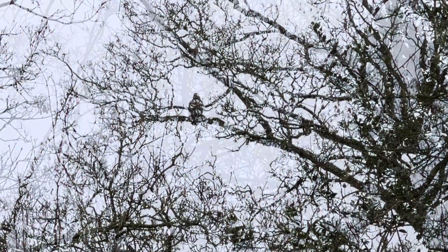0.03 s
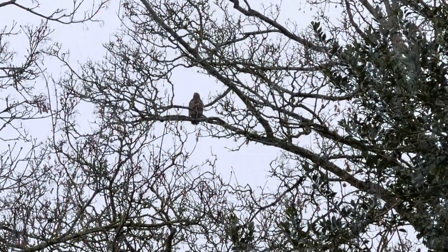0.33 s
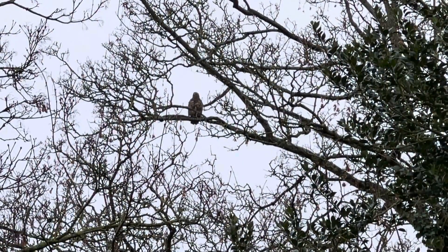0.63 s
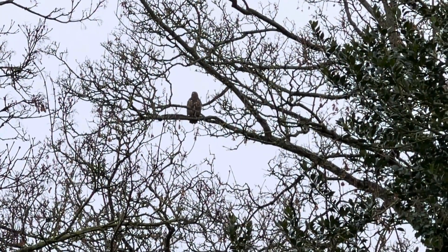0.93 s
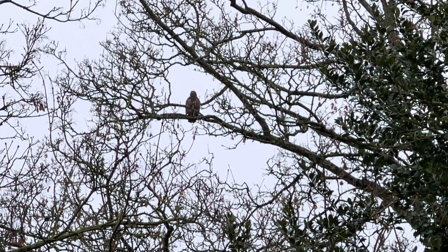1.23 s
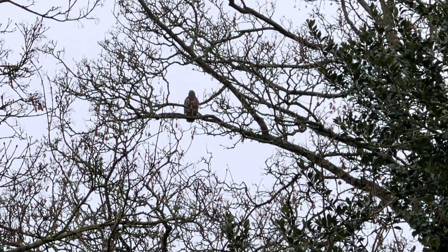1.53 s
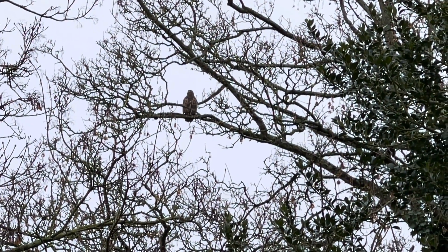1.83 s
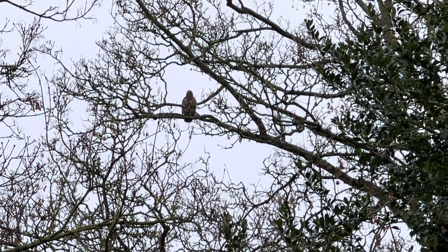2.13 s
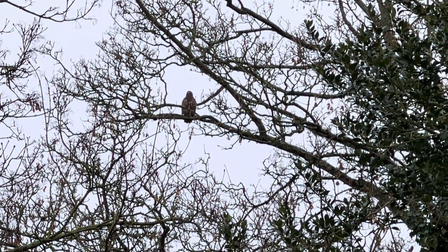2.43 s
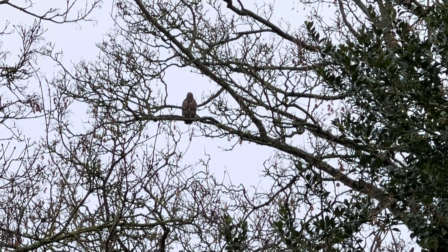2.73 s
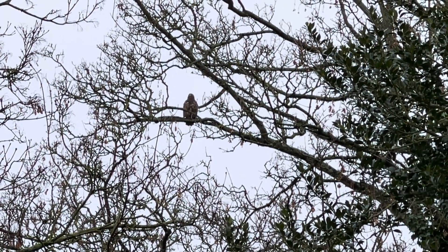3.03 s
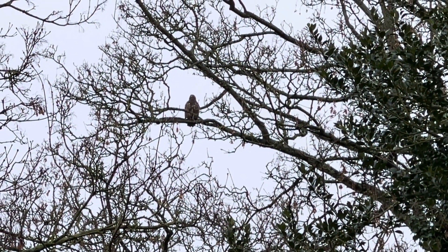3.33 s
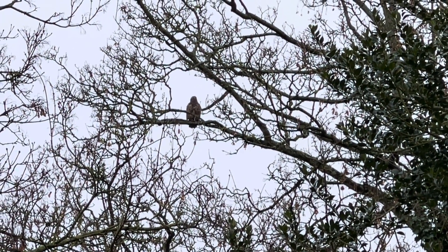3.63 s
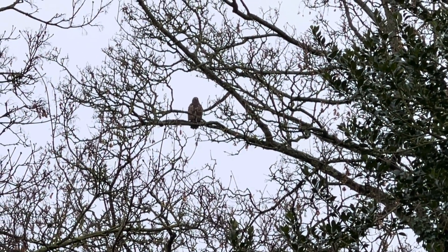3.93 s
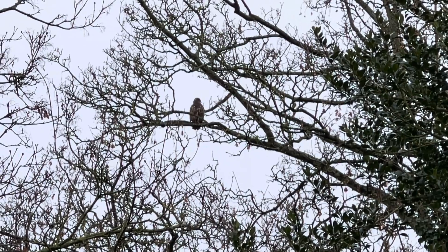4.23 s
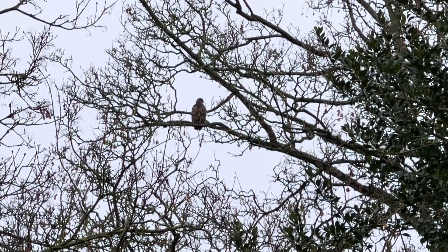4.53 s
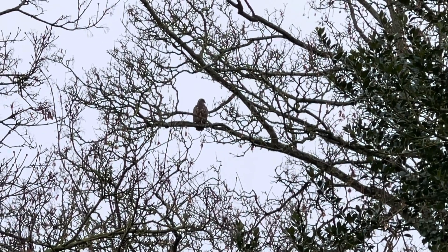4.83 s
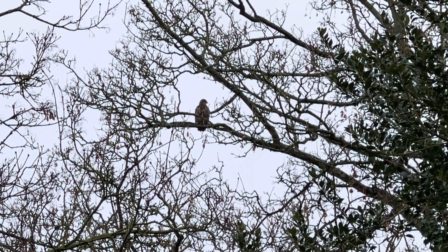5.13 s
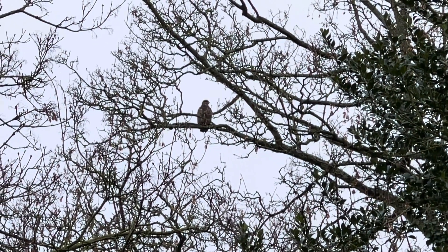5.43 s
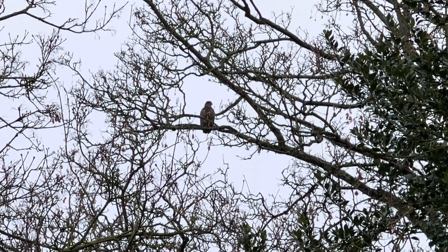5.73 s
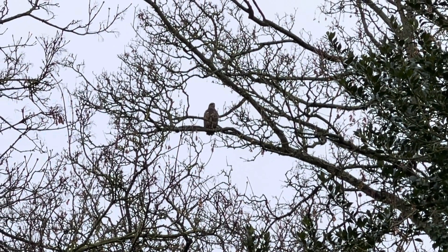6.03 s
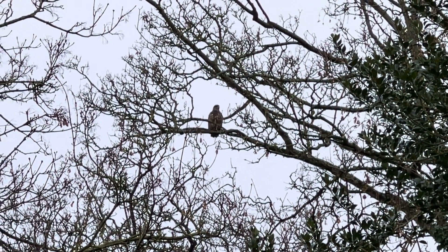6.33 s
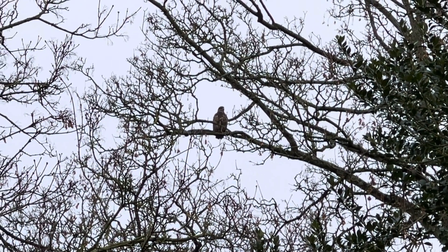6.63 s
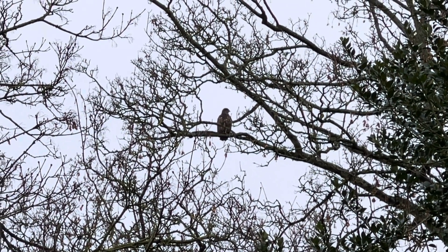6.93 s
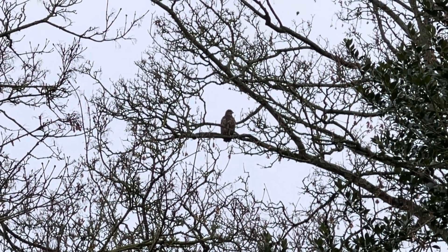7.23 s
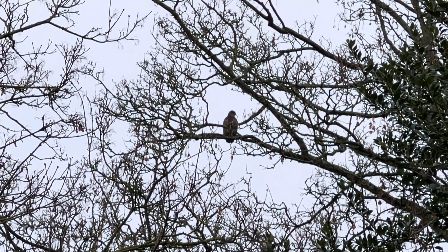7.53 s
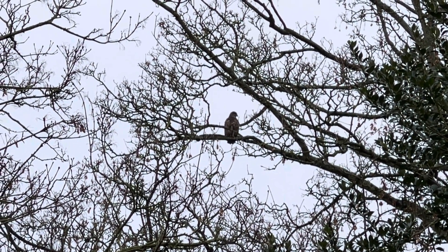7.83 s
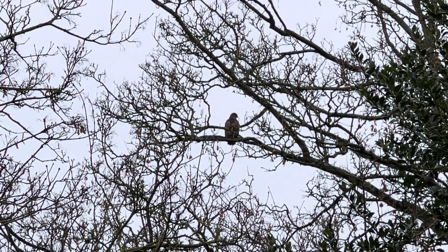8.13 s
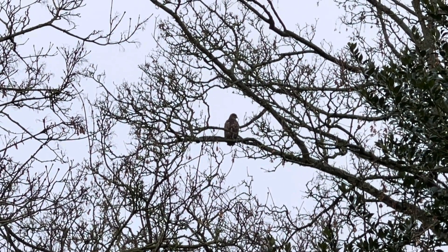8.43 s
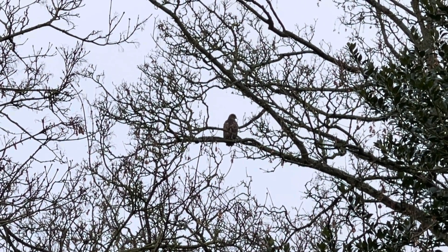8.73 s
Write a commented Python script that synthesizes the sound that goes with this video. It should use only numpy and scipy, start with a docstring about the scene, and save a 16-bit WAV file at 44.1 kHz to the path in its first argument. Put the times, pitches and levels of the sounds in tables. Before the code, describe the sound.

Small songbirds whistle, chirp, buzz and twitter in a garden over a low rumble of distant traffic and faint leaf hiss.

```python
"""Small songbirds sing in a winter garden: thin whistles come first, then buzzes, a nasal call,
hoarse and clear slides, falling chirps and a two-voiced twitter. Each note comes from a vibrating
membrane in the voice box; trunks and branches scatter it into a soft echo. Farther birds call
and chatter over a faint hiss of leaves and the low rumble of distant traffic."""
import sys
import numpy as np
from scipy import signal
from scipy.fft import rfft, irfft, next_fast_len
from scipy.io import wavfile
from scipy.ndimage import uniform_filter1d, map_coordinates

SR = 44100
rng = np.random.default_rng(int(sys.argv[2]) if len(sys.argv) > 2 else 0)


def bounce(signal):
    """Save signal as a 16-bit WAV file at the path given by the first command-line argument."""
    frames = np.transpose(np.atleast_2d(signal))
    limited = np.clip(frames, -1, 1)
    pcm = np.round(limited * 32767).astype(np.int16)
    wavfile.write(sys.argv[1], SR, pcm)


N = 396459

# the tones in a clear, almost pure voice: pitch_multiple, level_db
CLEAR_VOICE = [(1, 1), (2, -40.5)]
PROGRESS = np.linspace(0, 1, 25)  # from a note's start to its end
LEFT_RIGHT = np.array([[1], [-1]])  # opposite signs for the two ears


def undb(db):
    """Turn decibels into a gain."""
    return 10 ** (np.asarray(db) / 20)


def unit(x):
    """Scale a sound to an average power of 1."""
    return x / np.sqrt(np.mean(x ** 2))


def add(track, start_s, sound):
    """Mix a sound into a track."""
    start = max(int(start_s * SR), 0)
    track[start:start + len(sound)] += sound[:max(len(track) - start, 0)]


def wander(rate_hz, size):
    """A smooth random curve that strays about 1 either side of zero."""
    step = max(int(SR / rate_hz), 1)
    knots = rng.standard_normal(size // step + 2)
    return 1.335 * uniform_filter1d(np.interp(np.arange(size) / step, np.arange(len(knots)), knots), step)


def colour(points):
    """A gain for every frequency, drawn through (frequency_hz, level_db) points."""
    hz, db = np.transpose(points)
    frequencies = np.fft.rfftfreq(next_fast_len(N), 1 / SR)
    return undb(np.interp(np.log(frequencies + 1), np.log(hz), db))


def noise(gain):
    """Noise with the given gain at each frequency."""
    size = next_fast_len(N)
    return irfft(rfft(rng.standard_normal(size)) * gain, size)[:N]


def traffic():
    """Distant traffic: a rumble almost alike in both ears, and tyre noise from all around."""
    # tone of the traffic: frequency_hz, relative_db
    spectrum = [(12, -42), (20, -15.5), (36, -3.5), (59, 1.5), (91, -6), (238, -15), (290, -20), (320, -19),
                (375, -25), (493, -24), (544, -24.5), (856, -24), (2200, -38.5), (2860, -66.5),
                (4840, -120)]
    # how much the two ears differ: frequency_hz, side_minus_middle_db
    width = [(60, -23), (100, -19), (180, -12.5), (320, -6.5), (550, -2), (1660, -5.5)]
    # the traffic swells and fades: time_s, rumble_db, tyres_db
    levels = [(0.0, -53, -62.5), (1.0, -52, -62), (1.55, -54, -62.5), (3.25, -55.5, -63), (4.078, -53, -65),
              (4.33, -55, -64.5), (7.91, -55, -63.5), (8.16, -55, -60.5), (8.99, -51, -66)]
    times, rumble_db, tyres_db = np.transpose(levels)
    rumble_share = colour([(220, 0), (400, -37.5)])
    tyres_share = np.sqrt(1 - rumble_share ** 2)
    out = 0
    for share, level_db in ((rumble_share, rumble_db + 1), (tyres_share, tyres_db + 1)):
        gain = colour(spectrum) * share
        middle, side = noise(gain), noise(gain * colour(width))
        drifting_db = np.interp(np.arange(N) / SR, times, level_db) + .5 * wander(4.3, N)
        out += (middle + LEFT_RIGHT * side) / np.std(middle) * undb(drifting_db)
    return out


def leaves(level_db=-75, side_db=-8):
    """Leaves and very distant birds blur into a faint, drifting hiss."""
    # tone of the hiss: frequency_hz, relative_db
    spectrum = [(1500, -5.5), (2300, 1), (3500, 1.5), (5000, -9.5), (6500, -9), (9000, -20.5), (12000, -21),
                (14000, -61)]
    gain = colour(spectrum)
    hiss = unit(noise(gain)) + LEFT_RIGHT * undb(side_db) * unit(noise(gain))
    return hiss * undb(level_db + 1.9 * wander(2.5, N))


def garden_echo(sound, twigs_db, twigs_s, tail_db, tail_s, treble_s, side_db=-20):
    """Branches echo first, then trees add a tail that dulls. Each time is for a fade of 60 dB."""
    t = np.arange(int(1.5 * SR)) / SR
    low_pass = signal.butter(4, 5500, fs=SR, output="sos")
    echoes = []
    for _ in range(2):  # middle, then side
        twigs = rng.standard_normal(len(t)) * (rng.random(len(t)) < 2500 / SR)
        twigs *= undb(-60 * t / twigs_s) * (1 - np.exp(-t / 0.0045))
        trees = rng.standard_normal(len(t))
        low = signal.sosfiltfilt(low_pass, trees)
        tail = low * undb(-60 * t / tail_s) + (trees - low) * undb(-60 * t / treble_s)
        tail *= 1 - np.exp(-t / 0.03)
        response = (undb(twigs_db) * unit(twigs) + undb(tail_db) * unit(tail)) / np.sqrt(len(t))
        echoes.append(signal.fftconvolve(sound, response)[:N])
    return echoes[0] + undb(side_db) * echoes[1] * LEFT_RIGHT


def breath(size, crest, edge_db):
    """Air pressure in a note: it opens, peaks near the crest (0 start, 1 end), falls and closes."""
    progress = np.linspace(0, 1, size)
    opening, closing = 0.013 + .003 * SR / size, 0.047  # shares of the note
    ramp = np.clip(np.minimum(progress / opening, (1 - progress) / closing), 0, 1)
    swell_db = np.interp(progress, [0, np.clip(crest, .05, .95), 1], [edge_db, 0, edge_db])
    return np.sin(np.pi / 2 * ramp) * undb(swell_db)


def sing(notes, voice, edge_db, waver, flutter_db, buzz_depth=0, buzz_hz=97.4, hoarse=0):
    """A membrane glides through each note's pitches; in a buzz its tension shakes fast and unevenly."""
    out = np.zeros(N)
    for start_s, length_s, db, crest, *pitches in notes:
        size = int(max(length_s, .008) * SR)
        steps = np.linspace(0, len(pitches) - 1, size)
        hz = map_coordinates(np.array(pitches, float), [steps], order=2, mode="nearest")
        shake_hz = buzz_hz * (1 + 0.325 * wander(116, size))
        shake = np.sin(2 * np.pi * np.cumsum(shake_hz) / SR)
        hz *= 1 + waver * wander(249.7, size) + buzz_depth * shake
        phase = 2 * np.pi * np.cumsum(hz) / SR
        tone = sum(undb(tone_db) * np.sin(multiple * phase) for multiple, tone_db in voice)
        flutter = wander(130, size)
        pressure = breath(size, crest, edge_db) * undb(db + flutter_db * (flutter - flutter.mean()))
        # an unsteady membrane smears each tone into a narrow band of noise
        grain = (1 + hoarse * wander(1400, size)) / np.sqrt(1 + hoarse ** 2)
        add(out, start_s, np.sqrt(2) * pressure * grain * tone)
    return out


def glide(start_hz, end_hz):
    """Pitch that moves in a straight line."""
    return start_hz + (end_hz - start_hz) * PROGRESS


def stepped_fall(top_hz, bottom_hz, ledge=.9):
    """Pitch that drops, lingers and drops again; a ledge of 1 is flat, 0 a straight fall."""
    return top_hz + (bottom_hz - top_hz) * (PROGRESS + ledge * np.sin(2 * np.pi * PROGRESS) / (2 * np.pi))


def turning_notes(rows, crest, roundness):
    """Notes that ease into a turning pitch and out again; the wider swing takes longer."""
    notes = []
    for start_s, length_s, db, start_hz, turn_hz, end_hz in rows:
        before, after = np.abs([start_hz - turn_hz, end_hz - turn_hz]) ** (1 / roundness)
        swing_hz = np.abs((before + after) * PROGRESS - before) ** roundness
        direction = np.sign(start_hz + end_hz - 2 * turn_hz)
        notes.append((start_s, length_s, db, crest, *(turn_hz + direction * swing_hz)))
    return notes


def remote_birds(count=44, centre_hz=3900):
    """The farthest birds scatter faint short notes, each with its own slope and arch."""
    span, notes = np.linspace(-1, 1, 5), []
    for when, length, loud, high, slope, arch in rng.uniform(-1, 1, (count, 6)):
        start_s = (when + 1) / 2 * N / SR
        octaves = 0.62 * high + 0.266 * slope * span - 0.13 * arch * span ** 2
        notes.append((start_s, 0.028 * 2 ** length, -71 + 4 * loud, .5, *(centre_hz * 2 ** octaves)))
    return sing(notes, CLEAR_VOICE, edge_db=-6, waver=.023, flutter_db=3)


def far_birds(arch_drop=0.26):
    """Birds in farther trees sing arched calls and thin, straight whistles."""
    # arched calls: start_s, length_s, level_db, top_hz, top_place (0 to 1)
    calls = [ (0.106, 0.082, -67, 4960, 0.51), (0.25, 0.036, -68.5, 4530, .7),
             (0.353, 0.025, -72, 4970, .95), (0.507, 0.047, -65.5, 4170, .55),
             (1.874, 0.016, -71.5, 3350, .6), (1.999, 0.019, -70, 3860, 0.88),
             (2.054, 0.018, -69, 3840, .9), (2.087, 0.077, -75, 7940, 0), (2.201, .016, -71, 3850, .05),
             (3.657, 0.024, -59, 3760, .05), (3.795, 0.093, -71.5, 4930, 0.62),
             (3.851, 0.077, -65.5, 4040, 0.49), (5.075, .095, -70.5, 8970, .45),
             (5.214, 0.085, -66.5, 5120, 0.55), (5.291, 0.052, -66, 4110, 0.02),
             (6.25, 0.094, -63, 5200, .8), (6.832, 0.031, -67, 4230, .2)]
    # thin whistles: start_s, length_s, level_db, start_hz, end_hz
    wisps = [ (1.53, 0.16, -79.5, 8400, 7840), (1.725, 0.3, -80, 8240, 8600),
             (1.917, 0.11, -75, 7670, 7090), (2.222, 0.15, -82.5, 5750, 5430),
             (4.316, 0.056, -66.5, 5150, 4970), (4.451, 0.039, -69, 5300, 4730),
             (4.538, 0.071, -74.5, 5660, 5870), (7.723, 0.57, -77, 8200, 7960),
             (7.731, 0.67, -80.5, 9130, 8800)]
    notes = []
    for start_s, length_s, db, top_hz, top_place in calls:
        from_top = (PROGRESS - top_place) / max(top_place, 1 - top_place)
        notes.append((start_s, length_s, db, .52, *(top_hz * (1 - arch_drop * from_top ** 2))))
    for start_s, length_s, db, start_hz, end_hz in wisps:
        notes.append((start_s, length_s, db, 1, *glide(start_hz, end_hz)))
    return sing(notes, CLEAR_VOICE, edge_db=-2, waver=.012, flutter_db=2)


def rasps(chatter_s=.058, chatter_hz=2220, chatter_width_hz=1150, grain_db=3):
    """Calls without a tone: grainy breath noise rings broadly in the throat."""
    # harsh calls and ticks: start_s, length_s, level_db, centre_hz, width_hz
    calls = [ (.985, 0.11, -59, 3180, 1900), (1.0, 0.11, -61.5, 7470, 2600),
             (2.366, 0.033, -62, 2780, 1200), (4.753, 0.023, -72, 5660, 1700),
             (4.842, 0.027, -69.5, 5500, 1700), (4.915, 0.021, -70, 5600, 2000),
             (8.103, 0.021, -76.5, 5900, 1800), (8.316, 0.026, -51, 5270, 1600)]
    # one bird repeats a short rasp, slowing down: start_s, level_db
    chatter = [(5.665, -58), (5.727, -58), (5.799, -56), (5.866, -59), (5.946, -61), (6.027, -59),
               (6.109, -60.5), (6.204, -60.5), (6.307, -56.5)]
    repeats = [(start_s, chatter_s, db, chatter_hz, chatter_width_hz) for start_s, db in chatter]
    out = np.zeros(N)
    for start_s, length_s, db, hz, width_hz in calls + repeats:
        size = int(length_s * SR)
        throat = signal.butter(3, [hz - width_hz / 2, hz + width_hz / 2], "band", fs=SR, output="sos")
        air = rng.standard_normal(size) * undb(grain_db * wander(300, size))
        rasp = unit(signal.sosfilt(throat, air))
        add(out, start_s, rasp * breath(size, crest=0.68, edge_db=-14) * undb(db))
    return out


def nasal_call():
    """A low note whose strong overtones make it sound nasal."""
    # the call: start_s, length_s, level_db, start_hz, turn_hz, end_hz
    call = [(2.825, 0.29, -59.5, 1148, 1191, 1138)]
    # its tones: pitch_multiple, level_db
    voice = [(1, -14), (2, -9), (3, -6), (4, 0), (5, -2), (6, -11), (7, -11), (8, -20), (9, -21)]
    notes = turning_notes(call, crest=0.75, roundness=2)
    return sing(notes, voice, edge_db=-8, waver=0.0106, flutter_db=1.5, hoarse=.26)


def buzzes():
    """Sliding notes that buzz as the membrane's tension shakes."""
    # buzzing notes: start_s, length_s, level_db, start_hz, turn_hz, end_hz
    slides = [ (2.425, 0.16, -60.5, 7300, 5900, 5900), (2.428, 0.26, -62, 3690, 2700, 2956),
              (2.514, .12, -42, 5600, 5590, 4300), (2.61, 0.13, -45.5, 4690, 5720, 5610),
              (3.222, 0.096, -39.5, 5410, 6310, 5310), (3.292, 0.055, -43, 5100, 6850, 6140)]
    # their tones: pitch_multiple, level_db
    voice = [(1, 0), (1.5, -27), (2, -31)]
    notes = turning_notes(slides, crest=0.43, roundness=1.4)
    return sing(notes, voice, edge_db=-8.5, waver=0.0241, flutter_db=3.5, buzz_depth=0.041, hoarse=.5)


def hoarse_slides():
    """Sharply turning notes, roughened by an unsteady membrane."""
    # hoarse notes: start_s, length_s, level_db, start_hz, turn_hz, end_hz
    slides = [ (2.927, 0.024, -48.5, 3670, 4400, 3970), (2.938, 0.054, -48, 2535, 3270, 2440),
              (3.03, 0.048, -51.5, 2600, 4360, 4400), (3.066, 0.054, -38, 4860, 3640, 3600),
              (3.11, 0.054, -40.5, 3690, 3480, 4280), (3.252, 0.035, -35, 6300, 6200, 4160),
              (3.39, .065, -46, 4450, 4450, 2124), (3.405, .038, -46.5, 2310, 3180, 2330),
              (3.513, 0.031, -38.5, 4600, 4510, 5210), (3.528, .118, -39, 3240, 4070, 2350)]
    # their tones: pitch_multiple, level_db
    voice = [(1, -3), (2, -30.5)]
    notes = turning_notes(slides, crest=.42, roundness=1.15)
    return sing(notes, voice, edge_db=-8, waver=.028, flutter_db=2.5, hoarse=.55)


def clear_slides():
    """Pure notes that swing smoothly to a turning pitch and back."""
    # clear notes: start_s, length_s, level_db, start_hz, turn_hz, end_hz
    slides = [ (.045, 0.21, -69, 6730, 8330, 7250), (.31, 0.21, -65.5, 7070, 8170, 7480),
              (6.011, 0.03, -40, 3974, 3080, 3500), (6.165, 0.068, -66, 7420, 7500, 6250),
              (6.41, 0.063, -59.5, 7850, 7800, 6400), (7.263, 0.031, -45, 5420, 3330, 3630),
              (7.343, .022, -41, 5750, 4400, 5060), (7.362, 0.028, -39.5, 4960, 4420, 4450),
              (7.487, .041, -46.5, 4870, 3890, 3890), (8.32, 0.086, -40.5, 5030, 6160, 4600),
              (8.445, 0.04, -40, 4290, 4520, 3970), (8.485, .04, -44.5, 4375, 4150, 4900),
              (8.573, .072, -40, 4620, 5104, 4810)]
    notes = turning_notes(slides, crest=0.79, roundness=2)
    return sing(notes, CLEAR_VOICE, edge_db=-7, waver=.007, flutter_db=2.5)


def chirps(crest=0.64):
    """Short notes that fall steeply, lingering halfway."""
    # chirps: start_s, length_s, level_db, top_hz, bottom_hz
    falls = [ (5.606, 0.046, -62, 6050, 4520), (5.778, .016, -57.5, 5080, 4180),
             (5.792, .016, -52.5, 7750, 5850), (5.809, 0.039, -50, 6990, 4130),
             (5.916, 0.015, -50, 7100, 5020), (5.925, 0.015, -44, 5100, 3900),
             (5.94, 0.013, -43, 4220, 2800), (6.095, 0.02, -43, 3887, 2787),
             (7.319, 0.0099, -45, 4770, 4010), (8.935, 0.058, -47.5, 4170, 3100)]
    notes = [(start_s, length_s, db, crest, *stepped_fall(top_hz, bottom_hz))
             for start_s, length_s, db, top_hz, bottom_hz in falls]
    return sing(notes, CLEAR_VOICE, edge_db=-7, waver=.016, flutter_db=2.5)


def twitter(crest=0.49, lead_s=.014, second_length_s=0.02, flick_hz=2040, flick_s=.002):
    """Each syllable is two overlapping falls, one from each side of the voice box."""
    # syllables: start_s, length_s, level_db, top_hz, bottom_hz
    syllables = [ (6.496, 0.033, -47, 8120, 6370), (6.548, 0.036, -43, 7740, 6400),
                 (6.607, 0.033, -43, 8000, 5520), (6.698, 0.035, -45.5, 8340, 5540),
                 (6.861, 0.032, -44, 8370, 5620), (6.933, .041, -47, 7900, 5290),
                 (7.038, 0.031, -48, 8900, 6350), (7.143, 0.04, -48, 8730, 5360)]
    flick = flick_hz * np.exp(-PROGRESS * second_length_s / flick_s)
    notes = []
    for start_s, length_s, db, top_hz, bottom_hz in syllables:
        notes.append((start_s, length_s, db, crest, *stepped_fall(top_hz, bottom_hz)))
        # the second side is earlier, lower and softer, and flicks up into its fall
        second_hz = 0.94 * glide(top_hz, bottom_hz) - flick
        notes.append((start_s - lead_s, second_length_s, db - 4.5, crest, *second_hz))
    return sing(notes, CLEAR_VOICE, edge_db=-7, waver=.016, flutter_db=2.5)


def whistles(scoop_s=0.01):
    """Each whistle scoops onto its pitch, then drifts evenly; a rough one wavers and flutters."""
    # whistles: start_s, length_s, level_db, crest (0 to 1), pitch_hz, end_hz, scoop_hz, rough (0 to 1)
    song = [ (0.078, 0.39, -52, .42, 3223, 3030, 11, 0.99), (.577, 0.18, -47, 1, 7120, 7133, 255, 0.39),
            (0.695, 0.16, -43, 0.34, 7220, 7150, 10, 0), (0.808, 0.24, -52, 0.05, 7030, 6990, 0, 0.76),
            (1.165, .22, -55.5, 0.1, 2784, 2668, 347, 0.73),
            (1.354, 0.31, -50, 0.04, 3967, 3765, 410, 0.59),
            (6.034, 0.025, -35.5, 0.44, 3520, 3190, 101, 0),
            (7.429, 0.019, -42, .72, 4060, 3550, -300, 0.3), (7.645, 0.12, -59, 0.97, 7550, 6770, 248, 0.6),
            (7.718, 0.057, -53.5, 0.98, 6480, 6190, 0, 0.3),
            (7.892, .15, -45.5, 0.64, 7370, 6550, -1200, 0.77),
            (8.104, 0.13, -41, 0.43, 7300, 6230, -4000, 0.57),
            (8.305, 0.082, -45, 0.74, 8430, 8750, -500, 0.3),
            (8.448, 0.13, -40, 0.39, 8470, 8500, -450, 0.16),
            (8.605, 0.29, -43.5, 0.56, 8460, 7880, -6, 0.26),
            (8.60, 0.18, -47.5, 0.64, 7980, 7350, -300, 0.3),
            (8.699, .087, -42, 0.86, 4460, 4690, -120, 0.36),
            (8.849, 0.084, -38.5, 0.55, 4597, 4780, -6, 0.15)]
    out = 0
    for start_s, length_s, db, crest, pitch_hz, end_hz, scoop_hz, rough in song:
        pitches = glide(pitch_hz, end_hz) + scoop_hz * np.exp(-PROGRESS * length_s / scoop_s)
        note = (start_s, length_s, db, crest, *pitches)
        out += sing([note], CLEAR_VOICE, edge_db=-12.5, waver=0.013 * rough, flutter_db=6.5 * rough)
    return out


def left_first(stereo):
    """Sound from the trees reaches the left microphone a little before the right."""
    # how far the left side is ahead: frequency_hz, lead_radians
    leads = [(1800, 0.15), (3100, .6), (4800, 0.58), (6800, 0.046), (8000, 0.54)]
    size = next_fast_len(N)
    lead = np.interp(np.fft.rfftfreq(size, 1 / SR), *np.transpose(leads))
    return irfft(rfft(stereo, size) * np.exp(.5j * lead * LEFT_RIGHT), size)[:, :N]


def scene():
    """Near singers, farther birds and their echoes, over traffic and leaves."""
    # a singer facing away sends more of its voice into the branches: time_s, echo_gain_db
    facing_away = [(1.7, -8), (2.5, -2), (3.7, -9), (5.898, -4.5), (6.3, -3.5), (6.5, -1), (7.199, 0.5),
                   (7.299, -5.5), (8.1, -0.5), (8.9, -4.5)]
    near = whistles() + clear_slides() + chirps() + twitter() + hoarse_slides() + buzzes() + nasal_call()
    far, remote, harsh = far_birds(), remote_birds(), rasps()
    echo_gain = undb(np.interp(np.arange(N) / SR, *np.transpose(facing_away)))
    scattered = near * echo_gain + harsh
    near_echo = garden_echo(scattered, twigs_db=-1, twigs_s=0.41, tail_db=-8.5, tail_s=1.32, treble_s=0.8)
    far_echo = garden_echo(far + remote, twigs_db=-.5, twigs_s=0.17, tail_db=-5, tail_s=2, treble_s=0.62)
    direct = near + harsh + undb(-3.5) * far + undb(-5) * remote  # distant birds arrive mostly as echoes
    return left_first(direct + near_echo + far_echo) + traffic() + leaves()


def record(dry, low_cut_hz=32, high_cut_hz=13300):
    """Filters take away the deepest rumble and the highest treble."""
    low_cut = signal.butter(3, low_cut_hz, "high", fs=SR, output="sos")
    high_cut = signal.ellip(8, .2, 70, high_cut_hz, fs=SR, output="sos")
    return signal.sosfilt(high_cut, signal.sosfilt(low_cut, dry))


dry = scene()
out = record(dry)
bounce(out)
```